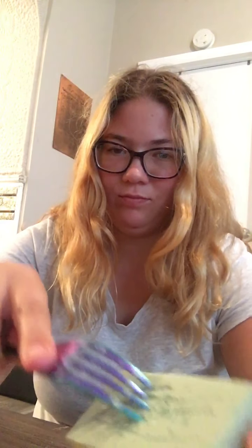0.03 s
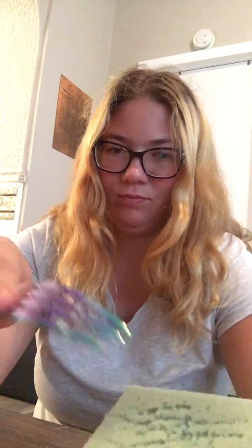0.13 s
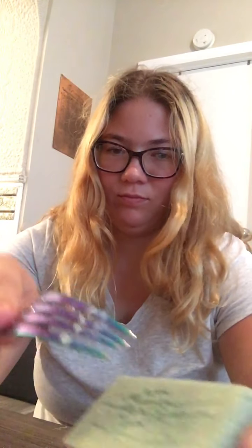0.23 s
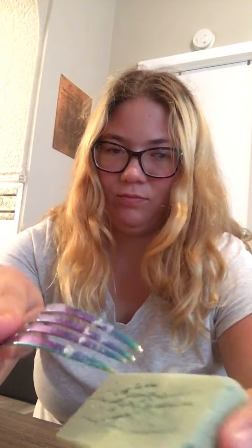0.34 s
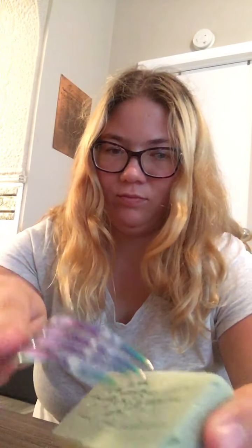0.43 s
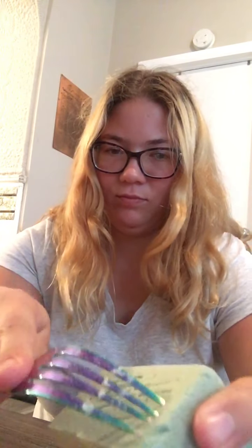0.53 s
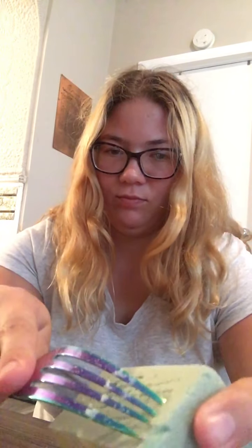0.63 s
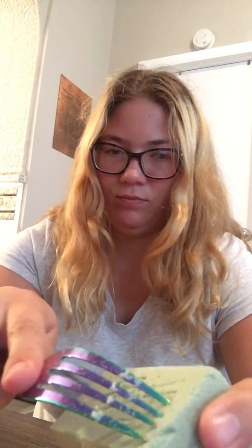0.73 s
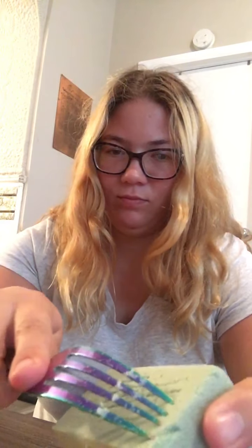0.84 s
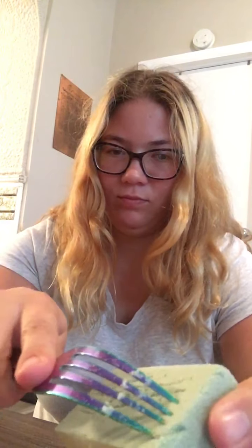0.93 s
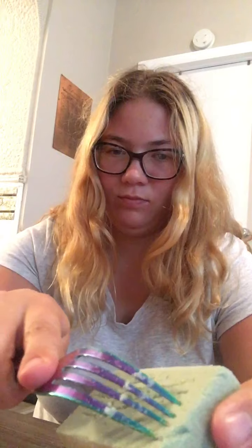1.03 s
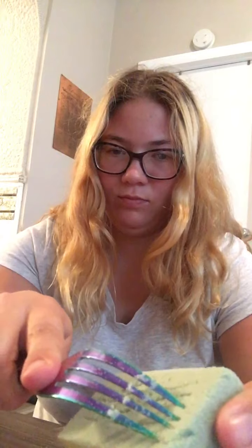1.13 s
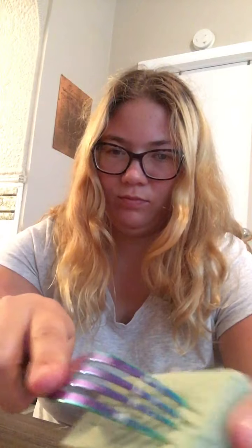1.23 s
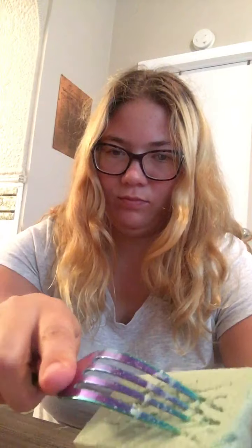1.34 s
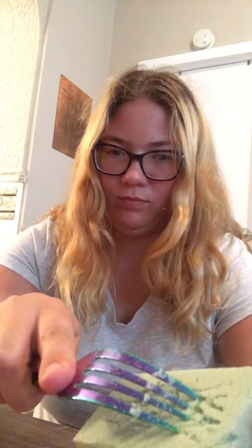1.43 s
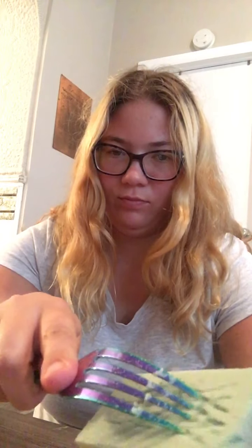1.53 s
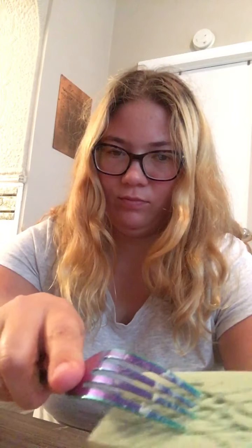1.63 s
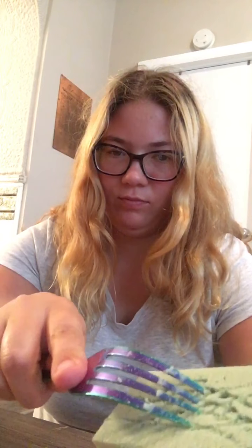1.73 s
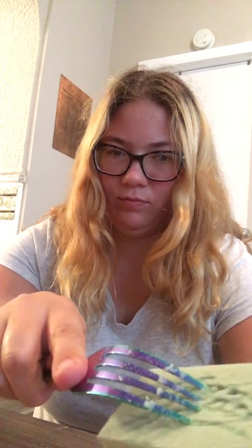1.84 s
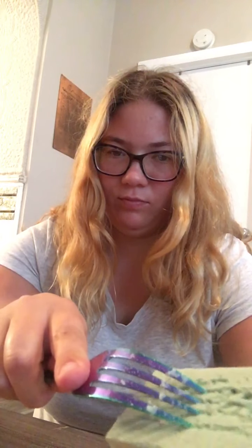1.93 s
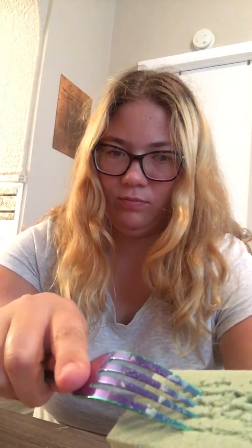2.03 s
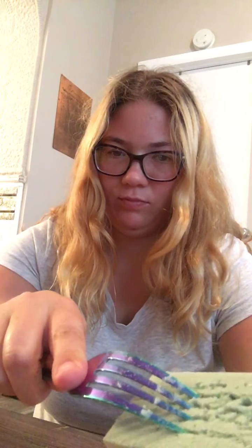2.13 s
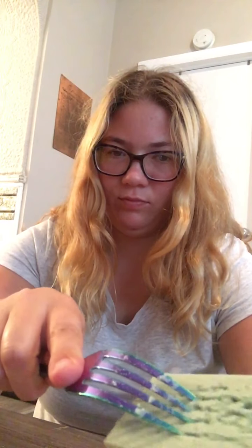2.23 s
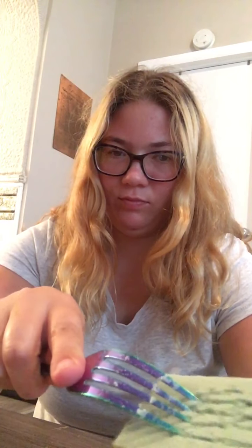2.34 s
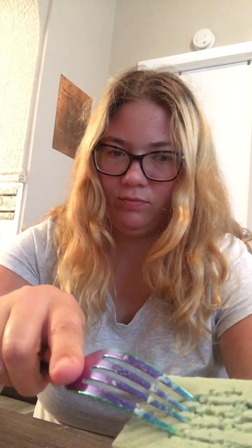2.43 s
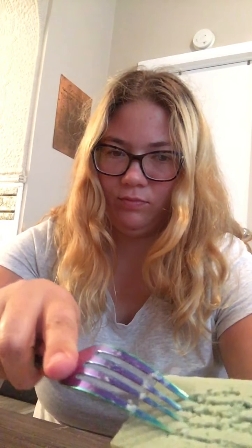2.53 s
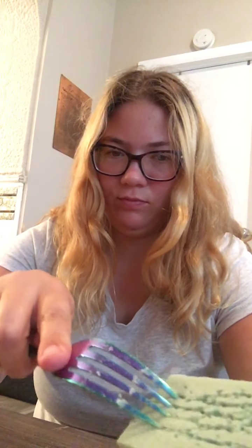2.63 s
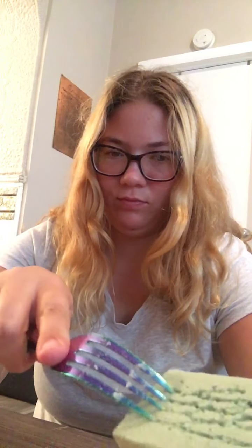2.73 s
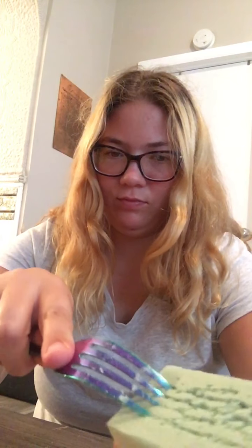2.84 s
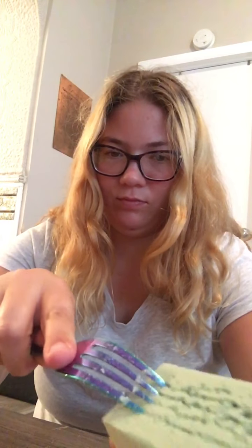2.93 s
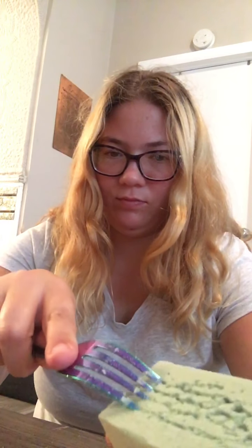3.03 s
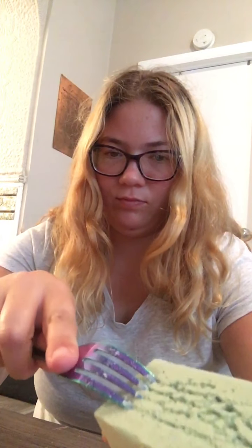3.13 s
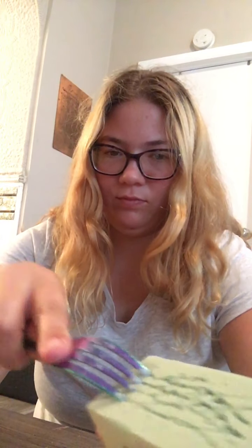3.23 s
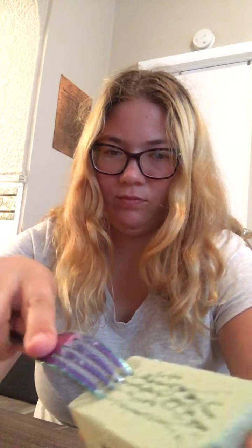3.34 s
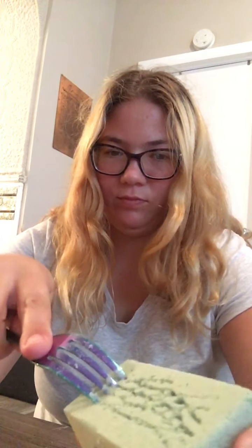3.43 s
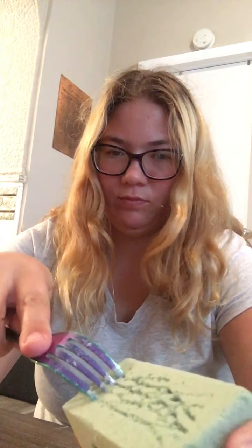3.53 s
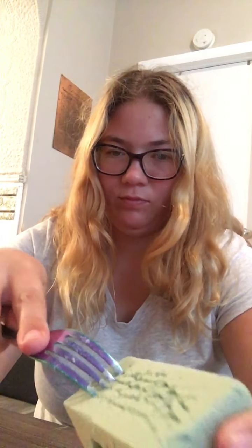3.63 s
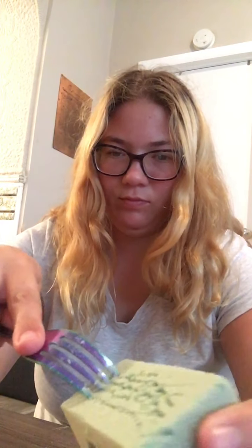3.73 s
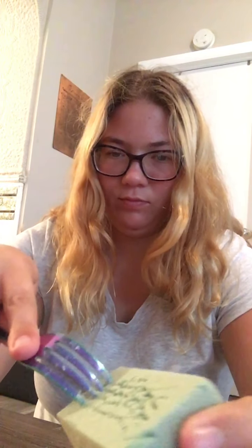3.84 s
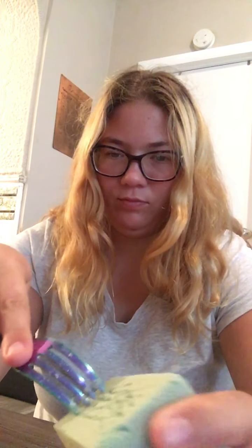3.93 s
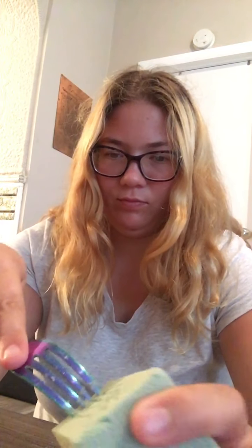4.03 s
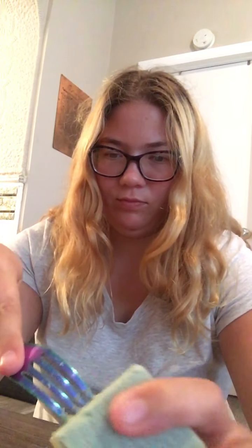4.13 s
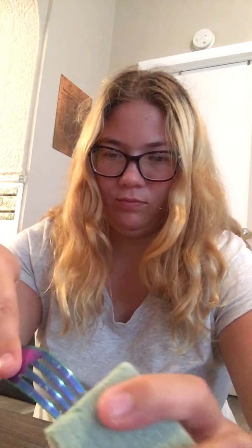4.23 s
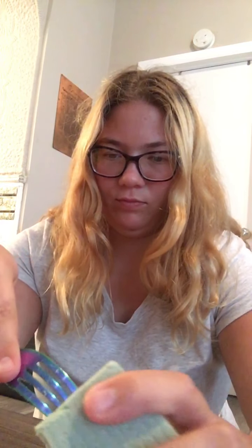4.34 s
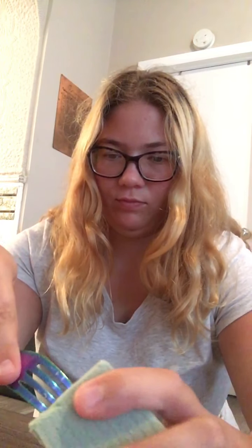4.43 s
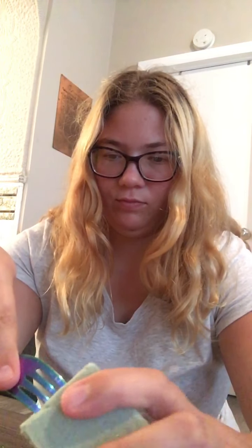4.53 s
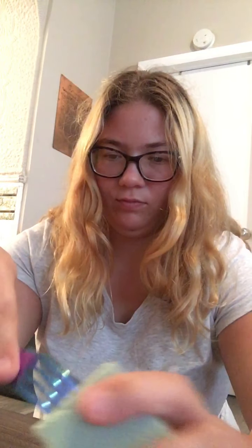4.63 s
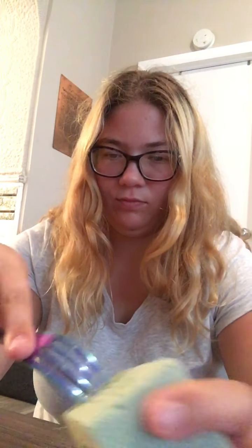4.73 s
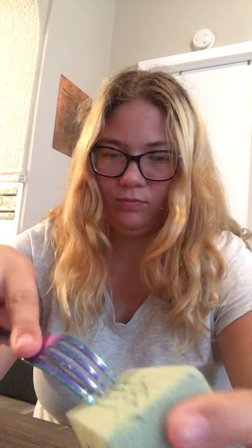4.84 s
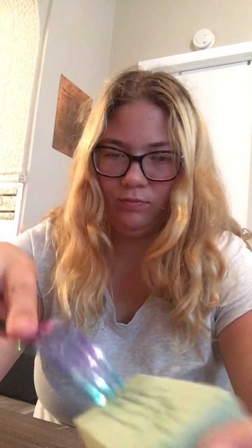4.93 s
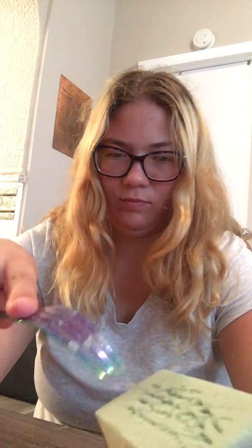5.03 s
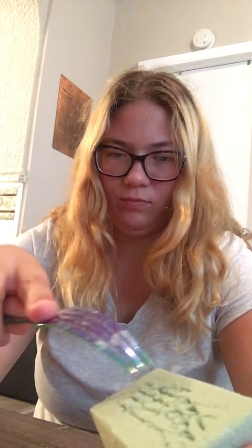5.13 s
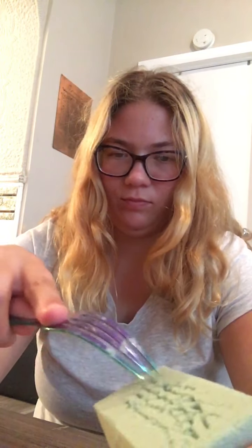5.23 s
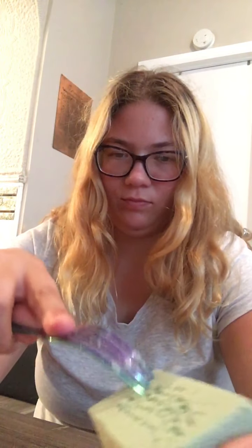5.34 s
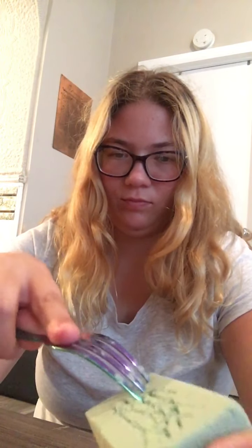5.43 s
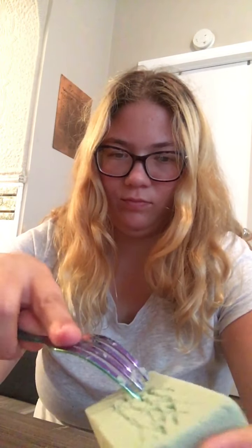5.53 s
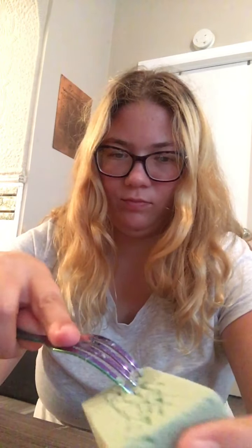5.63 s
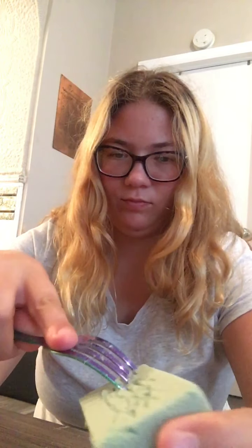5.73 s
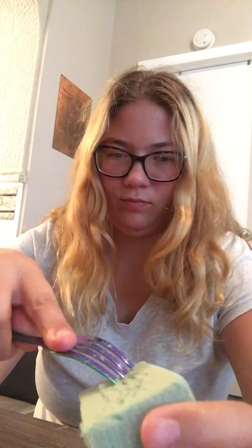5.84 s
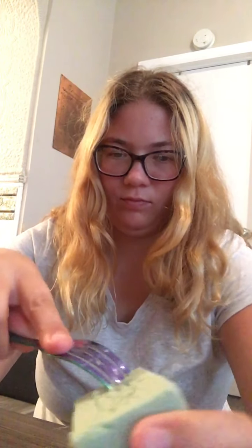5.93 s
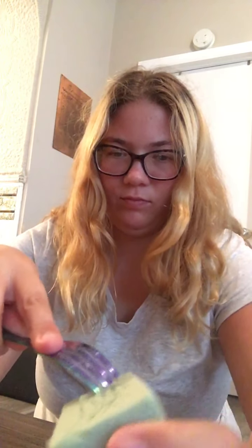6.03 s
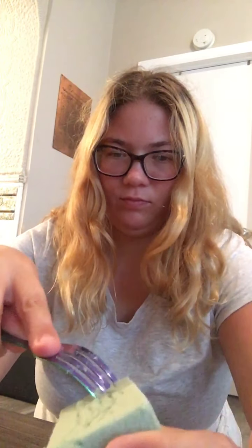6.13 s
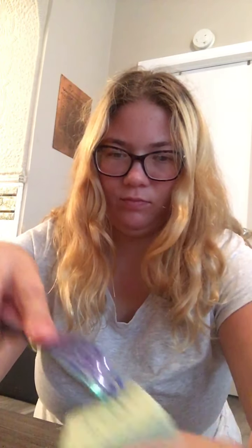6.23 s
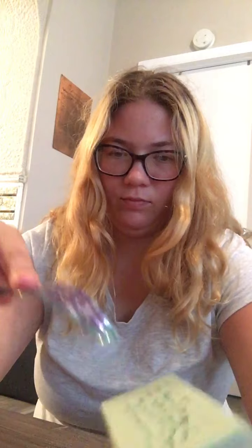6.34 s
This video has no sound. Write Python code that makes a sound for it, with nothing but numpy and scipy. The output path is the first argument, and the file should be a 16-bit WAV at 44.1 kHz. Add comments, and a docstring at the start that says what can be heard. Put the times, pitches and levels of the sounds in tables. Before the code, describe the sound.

A metal fork scrapes and digs into dry foam in short, crisp, crunching strokes, close up in a quiet room.

```python
"""A steel fork digs into and scrapes a block of dry foam, heard close up. Brittle cells burst in dense clumps,
larger walls snap, and a row of sharp peaks colours every crack. Crumbs tick off the tines and the hands rustle
softly. Behind them a quiet room adds a short tail, a soft hiss, a rumble, a drone and a low hum that wavers."""
import sys
import numpy as np
from scipy import signal
from scipy.fft import rfft, irfft, next_fast_len
from scipy.io import wavfile
from scipy.ndimage import uniform_filter1d, map_coordinates

SR = 44100
rng = np.random.default_rng(int(sys.argv[2]) if len(sys.argv) > 2 else 0)


def unload_audio(sound):
    """Save the sound as a 16-bit wav file, at the path given as the first command line argument."""
    columns = np.transpose(np.atleast_2d(sound))
    # keep every value between -1 and 1, then stretch to whole-number steps
    steps = np.round(np.clip(columns, -1, 1) * 32767)
    wavfile.write(sys.argv[1], SR, steps.astype(np.int16))


N = 281799
TIME = np.arange(N) / SR


def amp(db):
    """dB to gain."""
    return 10 ** (np.asarray(db) / 20)


def unit(x):
    """x at rms 1."""
    return x / np.sqrt(np.mean(x ** 2) + 1e-20)


def along(points, hz):
    """Read (f/Hz, value) breakpoints on a log frequency axis."""
    f, values = np.transpose(points)
    return np.interp(np.log(hz + 1), np.log(f + 1), values)


def bells(bands, hz):
    """EQ curve in dB from bell bands (f/Hz, width/Hz, gain/dB)."""
    return sum(db / (1 + (2 * (hz - centre) / width) ** 2) for centre, width, db in bands)


def automation(rows):
    """One per-sample lane for each column after t/s."""
    times, *lanes = np.transpose(rows)
    return [np.interp(TIME, times, lane) for lane in lanes]


def wobble(rate):
    """A smooth random LFO, rate knots a second."""
    return map_coordinates(rng.standard_normal(N // 20), [TIME * rate])


def swells(rows, curve=2.425):
    """Envelope of the strongest of overlapping swells, each reaching full level at its time."""
    out = np.full(N, 1e-5)
    for s, db, attack, hold, release in rows:
        corners = np.cumsum([s - abs(attack), abs(attack), abs(hold), abs(release)])
        span = slice(*np.searchsorted(TIME, corners[[0, -1]]))
        ramp = np.interp(TIME[span], corners, [0, 1, 1, 0])
        out[span] = np.maximum(out[span], amp(db) * ramp ** curve)
    return out


def filtered(x, gain):
    """Minimum-phase EQ with response gain(f/Hz): no ringing ahead of a crack."""
    size = 2 * next_fast_len(N // 2 + SR // 4)
    cepstrum = irfft(np.log(gain(np.fft.rfftfreq(size, 1 / SR)) + 1e-6), size)
    cepstrum[1:size // 2] *= 2
    cepstrum[size // 2 + 1:] = 0
    return irfft(rfft(x, size) * np.exp(rfft(cepstrum)), size)[:N]


# Tilt of the room hiss: f/Hz, relative level/dB
HISS_EQ = [(300, -17.5), (500, -22), (1000, -24.5), (2000, -31.5), (4000, -36), (8000, -39), (12000, -45),
           (16000, -41)]
def hiss(level_db=-67):
    """Soft room hiss whose level drifts slowly."""
    noise = filtered(rng.standard_normal(N), lambda f: amp(along(HISS_EQ, f)))
    return amp(level_db + 0.95 * wobble(1.5)) * unit(noise)


# Faders of the low bed: t/s, rumble level/dB, drone level/dB
LOW_BED = [(0, -74, -75), (.8, -73, -63.5), (1.5, -68, -69.5), (1.96, -65, -58.5), (2.35, -60, -64),
           (2.85, -80, -69.5), (4.4, -69.5, -67), (6.05, -63.5, -68), (6.39, -67, -63)]
def rumble_and_drone():
    """A narrow noise rumble around 52 Hz under a broad, dull drone."""
    rumble_db, drone_db = automation(LOW_BED)
    noise = rng.standard_normal((2, N))
    rumble = filtered(noise[0], lambda f: 1 / (1 + ((f - 52) / 17) ** 4))
    drone = filtered(noise[1], lambda f: f / 130 / (1 + (f / 130) ** 1.63) / (1 + (f / 400) ** 6))
    return amp(rumble_db) * unit(rumble) + amp(drone_db) * unit(drone)


# Path the hum wavers around: t/s, f/Hz, level/dB
HUM_PATH = [(0, 103, -67.5), (.34, 102, -66), (.84, 100, -70), (1.19, 99, -61), (1.55, 97.5, -69),
            (1.75, 95.4, -53), (1.98, 93.8, -66), (2.08, 99, -55), (2.18, 96, -54.5), (2.27, 97, -59),
            (2.4, 99, -55), (2.83, 98.5, -70), (3.4, 99, -57.5), (3.9, 99.4, -57.5), (4.38, 97, -67.5),
            (5.61, 93.5, -69.5), (6.05, 90.5, -54.5), (6.39, 88.5, -60)]
def hum(mains_hz=60, mains_db=-71):
    """A wavering hum near 100 Hz over a faint mains tone."""
    def tone(db, hz):
        return np.sqrt(2) * amp(db) * np.sin(2 * np.pi * np.cumsum(hz) / SR)

    pitch_hz, level_db = automation(HUM_PATH)
    upper = tone(level_db + 2.7 * wobble(11), pitch_hz + 5 * wobble(35))
    mains = tone(mains_db + 3 * wobble(4), mains_hz + 1.5 * wobble(8))
    return upper + mains


# Decay of the room: f/Hz, t60/s
ROOM_DECAY = [(300, 0.12), (3000, 0.21), (12000, 0.22)]
def room(x):
    """A short reverb tail whose lows die first."""
    hz, t, spectrum = signal.stft(rng.standard_normal(SR // 2), SR, nperseg=256)
    decay = amp(-60 * t / along(ROOM_DECAY, hz)[:, None])
    _, tail = signal.istft(spectrum * decay, SR, nperseg=256)
    return signal.fftconvolve(x, tail / np.linalg.norm(tail))[:N]


# Hand movements: t/s, level/dB, attack/s, hold/s, release/s
HAND_MOVES = [(.44, -62.5, 0.11, .07, .02), (6.28, -64.5, 0.033, 0.11, .05)]
# Resonant peaks of the brushing: f/Hz, width/Hz, relative level/dB
BRUSH_PEAKS = [(1800, 1000, 1), (3190, 350, -12.5), (4600, 500, -9.5)]
def rustle():
    """Hands brush the block: soft, fluttering midrange noise."""
    def peaks(f):
        return sum(amp(db) / (1 + (2 * (f - hz) / width) ** 2) for hz, width, db in BRUSH_PEAKS)

    brush = unit(filtered(rng.standard_normal(N), peaks))
    return swells(HAND_MOVES) * amp(0.9 * wobble(48)) * brush


# Crumb hits: t/s, level/dB, f/Hz
CRUMB_TICKS = [(4.989, -56, 14000), (5.008, -52, 8000), (5.019, -50, 7600), (5.030, -58, 6000),
               (5.097, -61, 12500), (5.118, -52, 7500), (5.1448, -51, 7600), (5.157, -60, 14500)]
def crumbs(t60=.006):
    """Crumbs tick off the tines: tiny bright pings with ragged envelopes."""
    out, t = np.zeros(N), np.arange(SR // 100) / SR
    for s, db, hz in CRUMB_TICKS:
        ragged = 1 + 1.8 * uniform_filter1d(rng.standard_normal(len(t)), size=5)
        out[round(s * SR):][:len(t)] += amp(db - 60 * t / t60) * ragged * np.sin(2 * np.pi * hz * t)
    return out


# Larger walls breaking: t/s, pre-EQ level/dB, t60/s
WALL_SNAPS = [(.0336, -17.5, 0.0032), (.0922, -23, 0.014), (.514, -30, 0.025), (.5656, -31, 0.033),
              (.5885, -39.5, .03), (.6117, -22, 0.019), (.6285, -29, 0.011), (.6643, -36, 0.031),
              (.7055, -35, 0.022), (.7801, -27, 0.025), (.7875, -25, 0.0099), (.844, -24, .025),
              (.8992, -22, 0.027), (.9384, -26, 0.038), (1.0987, -28.5, .03), (1.2256, -18, 0.03),
              (1.5658, -26, 0.033), (1.5875, -14, .006), (1.7438, -38, .015), (1.7617, -29, .02),
              (1.8755, -20.5, 0.037), (1.9182, -23, 0.025), (1.9795, -27, 0.018), (1.9958, -12, .02),
              (2.5068, -26.5, .02), (2.579, -28, .02), (2.6232, -14.5, 0.014), (2.631, -16, 0.017),
              (2.7842, -36, 0.0085), (3.3207, -26, 0.031), (3.387, -28.5, .015), (3.4101, -27.5, 0.024),
              (3.5349, -43, .03), (3.546, -38.5, 0.045), (3.5755, -33.5, 0.022), (3.5887, -27, 0.017),
              (4.1505, -26, 0.003), (4.2662, -22, .004), (4.6245, -38, 0.018), (5.2745, -34.5, .04),
              (5.5249, -38, .03), (5.7356, -19, 0.0075), (6.1881, -29.5, 0.04)]
def snaps():
    """Each wall breaks with a sudden, fast-dying puff of noise."""
    out, t = np.zeros(N + SR), np.arange(SR // 20) / SR
    for s, db, t60 in WALL_SNAPS:
        envelope = amp(-60 * t / t60) * np.minimum(t / (0.051 * t60), 1)
        puff = envelope * rng.standard_normal(len(t))
        puff *= np.linalg.norm(envelope) / np.linalg.norm(puff)
        out[round(s * SR):][:len(t)] += amp(db) * puff
    return out[:N]


def cells(bite, dust, base_per_s=900, spread_db=7.0, decay_s=0.0003):
    """Cells burst in clumps over fine dust, faster under a harder bite, a few much louder."""
    chance, size = rng.random(N), rng.exponential(1, N)
    rate = base_per_s * np.clip((bite / amp(-41)) ** .6, .5, 8)
    pops = (chance < rate / SR) * amp(spread_db * np.minimum(size, 2.2))
    pops *= np.sqrt(base_per_s / rate)  # density alone adds no loudness
    envelope = signal.lfilter([1], [1, -np.exp(-1 / (decay_s * SR))], pops)
    crackle = unit(envelope * rng.standard_normal(N))
    clumps = amp(1.04 * wobble(30) + 0.47 * wobble(110))
    return bite * unit(clumps * (crackle + dust * rng.standard_normal(N)))


# Broad spectrum of breaking foam: f/Hz, relative level/dB
FOAM_EQ = [(150, -30.5), (400, -38.5), (700, -21.5), (1200, -23.5), (2200, -8), (3800, 1.5), (6500, -10),
           (8500, -11.5), (11000, -14), (16000, -15)]
# Peaks and notches that colour the crunch: f/Hz, width/Hz, gain/dB
COLOUR_EQ = [(383, 240, 17.5), (947, 210, 11.5), (1450, 470, 9.5), (2410, 900, 8.5), (3187, 670, 12.5),
             (3960, 780, -11), (4490, 610, 5), (4934, 260, -8.5), (6075, 260, 6), (7530, 630, 2),
             (9200, 440, 0.5), (10350, 510, -7), (11260, 400, 1), (12700, 430, 0.5)]
# Crossovers between the nine bands of the crunch: f/Hz
CROSSOVERS = [650, 1200, 1900, 2750, 3800, 5000, 7000, 10400]
def body(cracks, faders_db):
    """Broad tilt and sharp peaks colour the cracks; each band flickers on its own around its fader."""
    grid = np.fft.rfftfreq(4096, 1 / SR)
    lowpasses = [lambda f, hz=hz: 1 / (1 + (f / hz) ** 16) for hz in CROSSOVERS]
    splits = [np.zeros_like, *lowpasses, np.ones_like]
    out = np.zeros(N)
    for lower, upper, db in zip(splits, splits[1:], faders_db):
        def band(f):
            colour = amp(along(FOAM_EQ, f) + bells(COLOUR_EQ, f))
            return colour * np.sqrt(np.abs(upper(f) - lower(f)))

        flickering = cracks * amp(db + 1.12 * wobble(45))
        out += filtered(flickering, band) / np.sqrt(np.mean(band(grid) ** 2))
    return out


# Ring of the block's edge: f/Hz, width/Hz, gain/dB
EDGE_EQ = [(5550, 410, -4.5), (5860, 250, 2), (7000, 510, 4.5), (8200, 500, -2)]
def block_edge(crunch, start_s=3.5, end_s=5.1, crossfade_s=0.12):
    """The ring shifts while the block is turned and the tines work its edge."""
    mix = np.clip(np.minimum(TIME - start_s, end_s - TIME) / crossfade_s, 0, 1)
    on_edge = filtered(crunch, lambda f: amp(bells(EDGE_EQ, f)))
    return (1 - mix) * crunch + mix * on_edge


# Drags and resting contact of the tines: t/s, pre-EQ level/dB, attack/s, hold/s, release/s
TINE_DRAGS = [(0, -34.5, .01, 0.093, 0.008), (.513, -62, .004, 3.6, 0.019), (.513, -48, .005, 0.49, .04),
              (1.05, -48, .05, 0.26, 0.019), (1.41, -50, .03, 0.25, 0.16), (1.77, -39.5, .045, .1, .05),
              (1.876, -31, .02, 0.054, 0.07), (2.15, -51, .15, 0.06, .05), (2.512, -32, .055, 0.13, 0.064),
              (2.82, -37.5, .05, 0.32, 0.013), (3.25, -46, .05, 0.2, 0.014), (3.582, -39.5, .04, .96, 0.06),
              (4.66, -37.5, 0.071, 0.087, 0.19), (4.8, -46, 0.073, 0.14, 0.0076),
              (5.274, -74, .004, 1.06, .01), (5.279, -37, .004, 0.11, .05), (5.6, -42, .03, .14, 0.045),
              (5.304, -26.5, .03, 0.063, 0.047), (5.529, -30.5, .025, 0.026, 0.048),
              (5.74, -40, .02, 0.1, 0.042), (5.927, -49, .05, 0.22, 0.063)]
# Shoves through the foam: peak t/s, pre-EQ level/dB, attack/s, release/s
TINE_SHOVES = [(0.57, -40, 0.038, 0.011), (.61, -41, .03, 0.21), (0.669, -38, 0.041, .022),
               (0.717, -39, 0.024, 0.097), (0.783, -35.5, 0.011, 0.21), (.85, -37.5, 0.064, .011),
               (.902, -39, 0.031, 0.055), (0.949, -35, 0.1, 0.11), (0.999, -40, 0.034, 0.054),
               (1.107, -30.5, 0.04, 0.048), (1.203, -37, 0.15, 0.034), (1.23, -23.5, 0.049, 0.023),
               (1.283, -25, 0.14, 0.015), (1.464, -44.5, 0.14, 0.029), (1.53, -41, 0.15, 0.071),
               (1.6, -23, 0.086, 0.061), (1.818, -29.5, 0.085, 0.13), (2.003, -28, 0.025, 0.032),
               (2.312, -25.5, 0.15, 0.061), (2.624, -26.5, 0.012, 0.034), (2.832, -29, 0.089, 0.17),
               (2.931, -32, 0.13, 0.096), (3.09, -31, 0.32, 0.09), (3.279, -36, 0.11, 0.17),
               (3.408, -38, 0.21, 0.066), (3.473, -43, .04, 0.01), (3.6, -36.5, 0.034, 0.63),
               (3.961, -37, 0.82, 0.32), (4.158, -35.5, 0.44, 0.052), (4.512, -37, 0.11, .1),
               (4.909, -37.5, 0.26, 0.041), (5.451, -26.5, 0.094, 0.084), (5.634, -31.5, 0.092, 0.19),
               (5.735, -32.5, 0.037, 0.2), (5.842, -43, .01, .01), (5.936, -44, 0.066, 0.036),
               (6.223, -32, 0.085, 0.037)]
# Band faders as the block turns, low to high, then the dust mix: t/s, thud/dB, knock/dB,
# low ring/dB, hollow mids/dB, rasp/dB, tine ring/dB, treble before trims/dB, dust/dB
CRUNCH_MIX = [(.05, -26.5, -20, -14, -5.5, -0.5, -2, -1.5, 1.5),
              (.52, -18, -18.5, -12.5, -0.5, 1, 0, -1, 0.5), (.9, -27.5, -18.5, -10, -5, -1, -2.5, 2, -1),
              (1.25, -21.5, -17.5, -7, -3.5, -1.5, -0.5, 0.5, 1),
              (1.59, -24.5, -20.5, -8.5, -1.5, 0, 0, 1.5, 1),
              (1.92, -21.5, -17.5, -10, -1.5, 4.5, 1.5, 1, 0.5),
              (2.4, -26.5, -20, -20.5, -8, 0.5, -1, -1, 1.5), (2.9, -24.5, -9, -8.5, 0, 6, 1.5, -3, 2.5),
              (3.3, -31.5, -22, -14, -7, -1.5, -0.5, -0.5, 0.5), (3.9, -31, -22, -13, -2.5, 0.5, 1, 0, 1.5),
              (4.5, -56, -21, -14.5, -4.5, 2.5, 2.5, -2, 1.5), (4.8, -36, -19, -12.5, -4, -1, -1, -2.5, 6),
              (5.33, -32.5, -21, -8.5, -2, -1.5, -2, -6, 0), (5.55, -27, -12.5, -5, -2, 2, -1, -5, 1.5),
              (6.0, -28.5, -25, -14, -4.5, 1, 1, -2, 1.5), (6.21, -36, -18.5, -10, -2.5, -0.5, 0, -5.5, 1)]
# Fader of the 5-7 kHz band: t/s, gain/dB
SHEEN_FADER = [(0, -2), (1.6, -2), (4.9, -1.5), (5.32, -1), (6.2, -4)]
def fork(shove_hold_s=0.0094, dull_above_db=-33.5, dull_db_per_db=0.27):
    """The tines drag and shove through the foam, bursting cells; a hard bite loses treble."""
    shoves = [(s - shove_hold_s / 2, db, attack, shove_hold_s, release)
              for s, db, attack, release in TINE_SHOVES]
    bite = swells([*TINE_DRAGS, *shoves])
    bite_db = 20 * np.log10(uniform_filter1d(bite, size=SR // 100))
    *lower_bands_db, treble_db, dust_db = automation(CRUNCH_MIX)
    sheen_db, = automation(SHEEN_FADER)
    treble_db -= dull_db_per_db * np.maximum(bite_db - dull_above_db, 0)
    cracks = cells(bite, dust=amp(dust_db)) + snaps()
    crunch = body(cracks, [*lower_bands_db, sheen_db, treble_db - 6.0, treble_db - 6.5])
    return block_edge(crunch)


def scene(reverb_db=-19.0):
    """Fork, crumbs and hands up front with a touch of reverb, over the room tone, in mono."""
    near = fork() + crumbs() + rustle()
    tail = amp(reverb_db) * room(near)
    room_tone = hiss() + rumble_and_drone() + hum()
    return (near + tail + room_tone)[None]


def record(dry, cutoff_hz=15700, slope_width_hz=220):
    """A steep high cut at the phone microphone's band limit."""
    rolloff = np.clip((np.fft.rfftfreq(N, 1 / SR) - cutoff_hz) / slope_width_hz, 0, 1)
    return irfft(rfft(dry) * np.cos(np.pi / 2 * rolloff) ** 4, N)


dry = scene()
out = record(dry)
unload_audio(out)
```